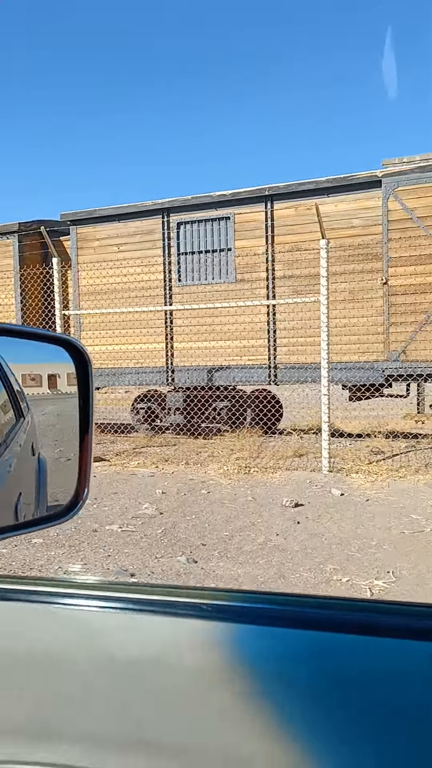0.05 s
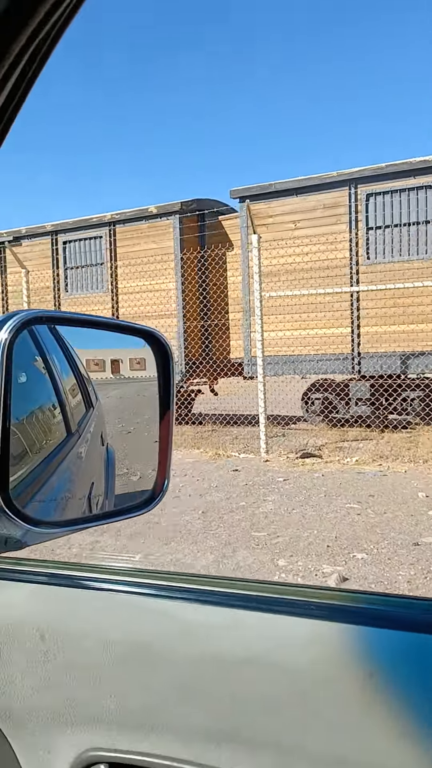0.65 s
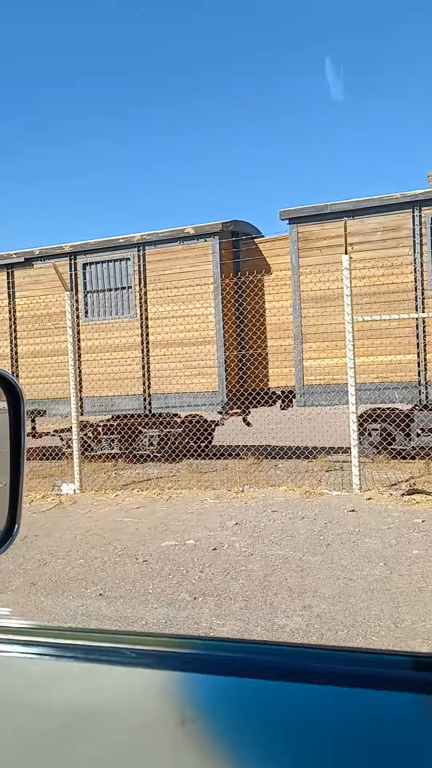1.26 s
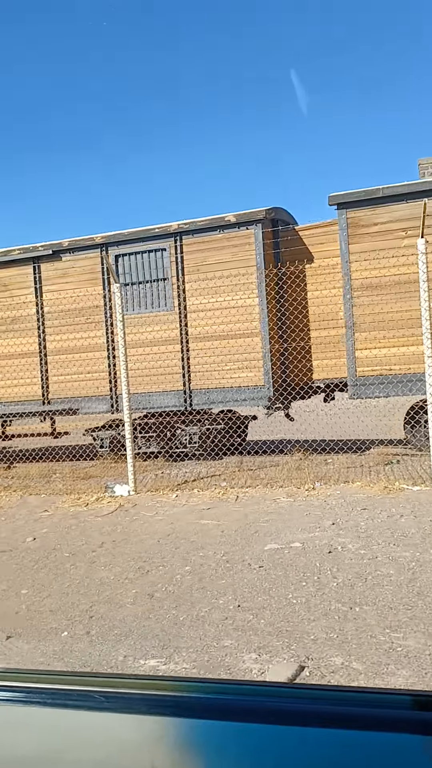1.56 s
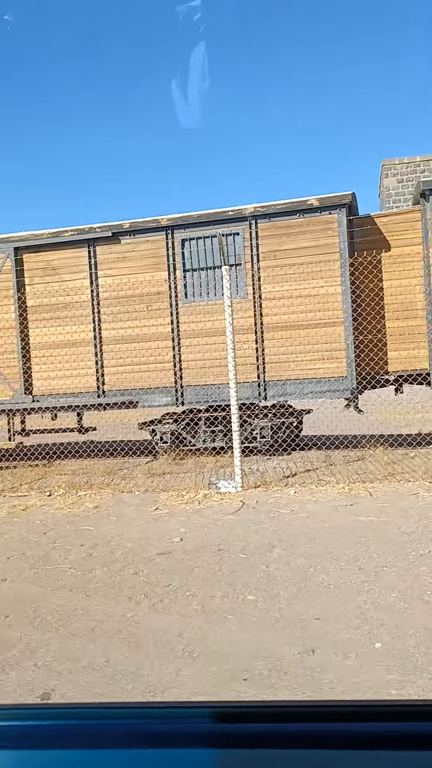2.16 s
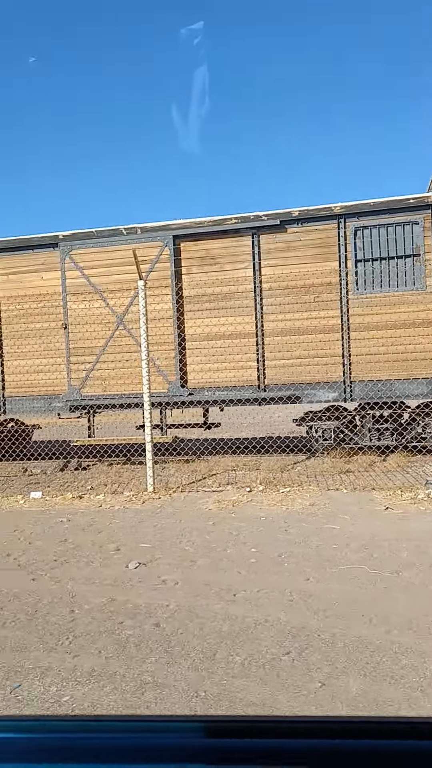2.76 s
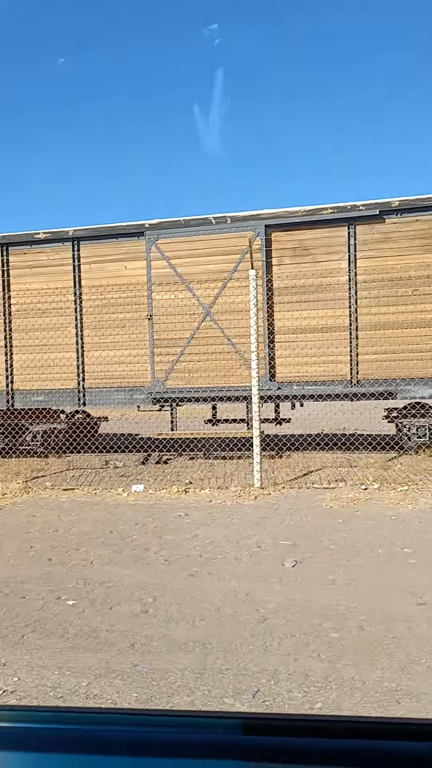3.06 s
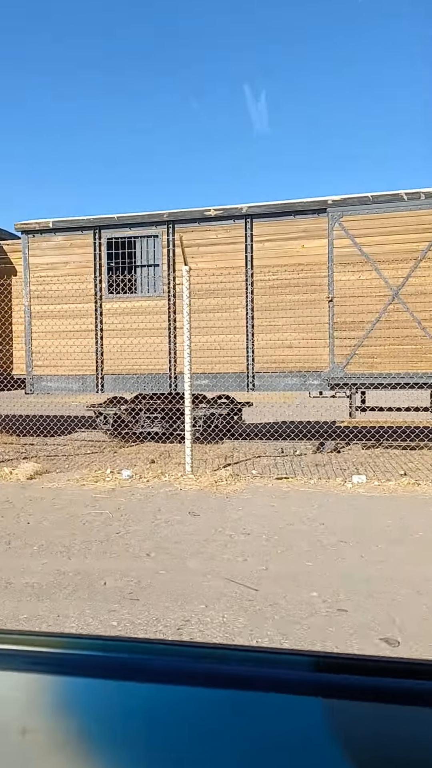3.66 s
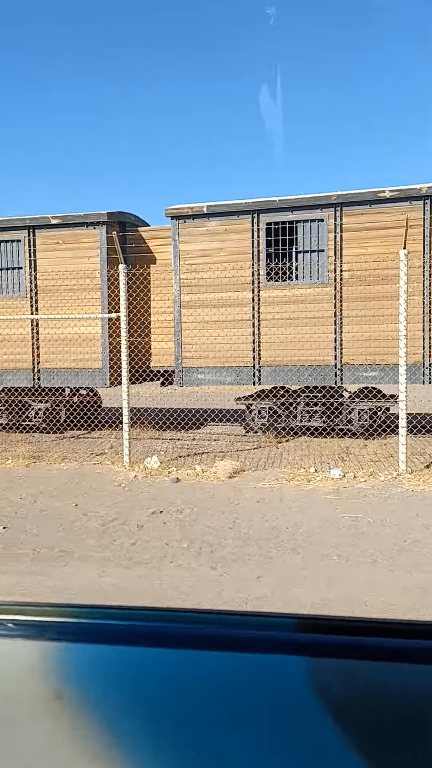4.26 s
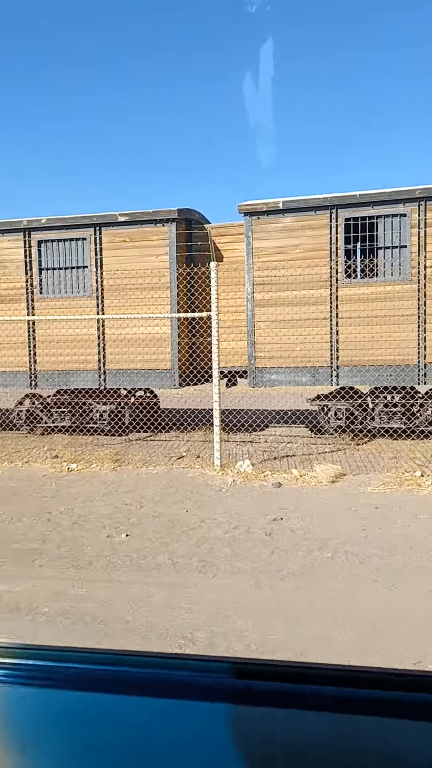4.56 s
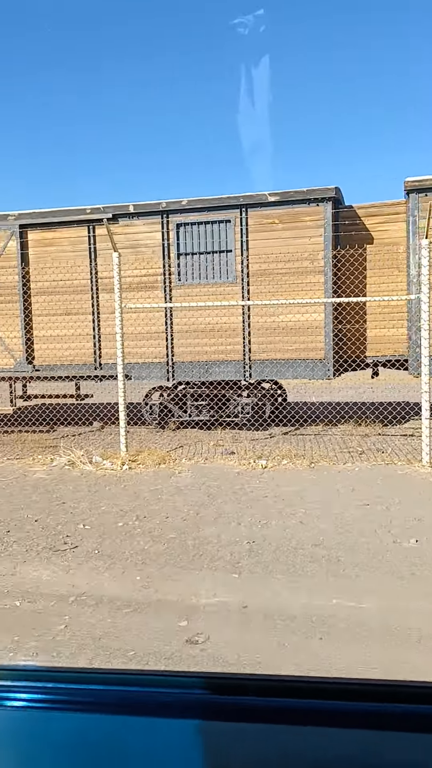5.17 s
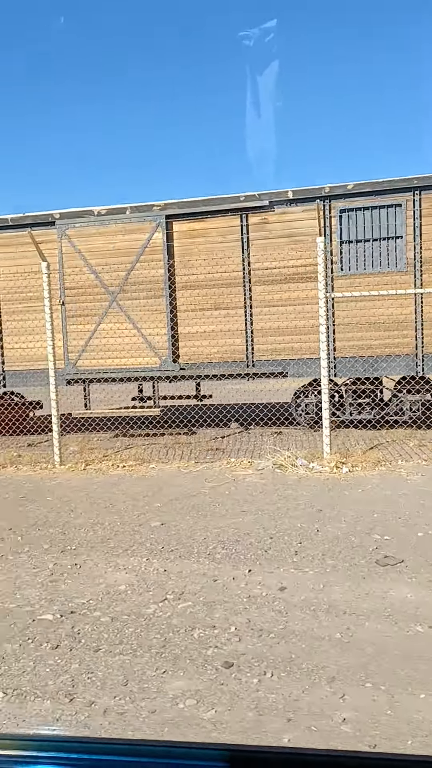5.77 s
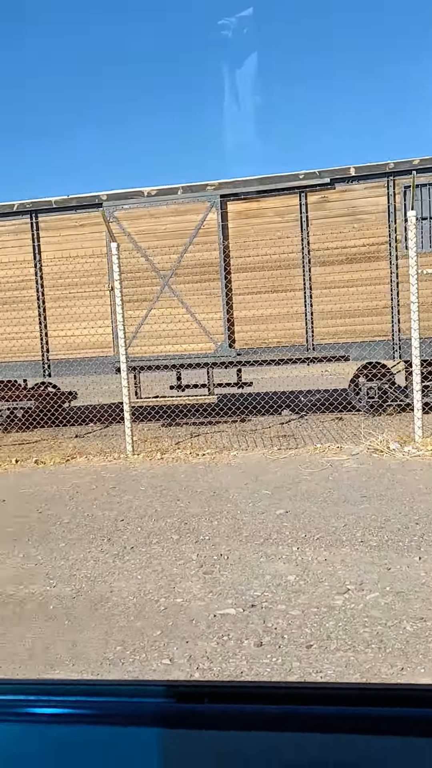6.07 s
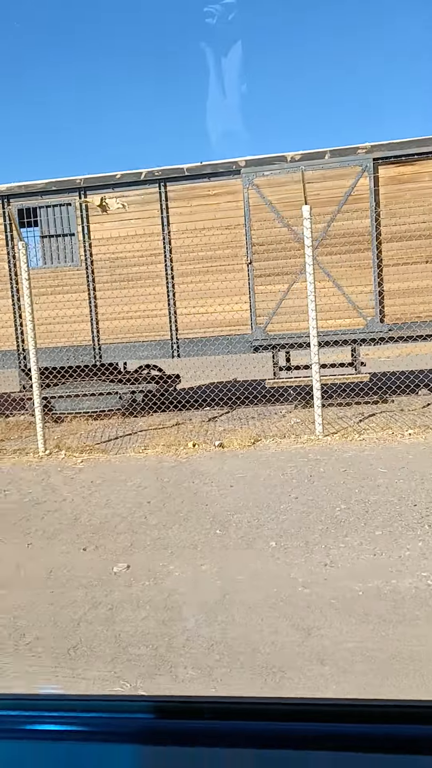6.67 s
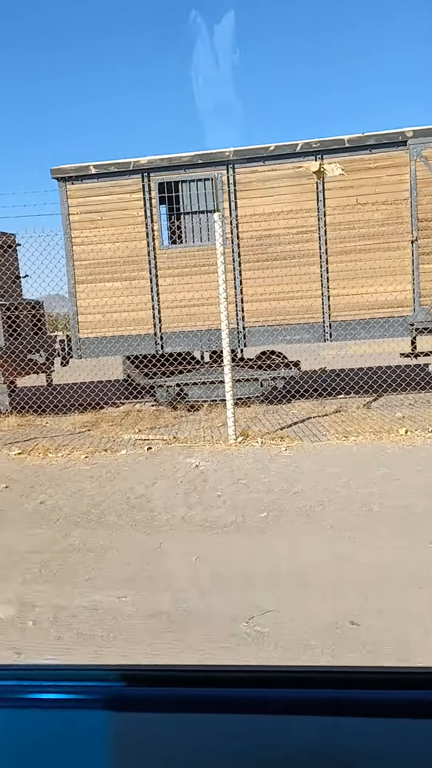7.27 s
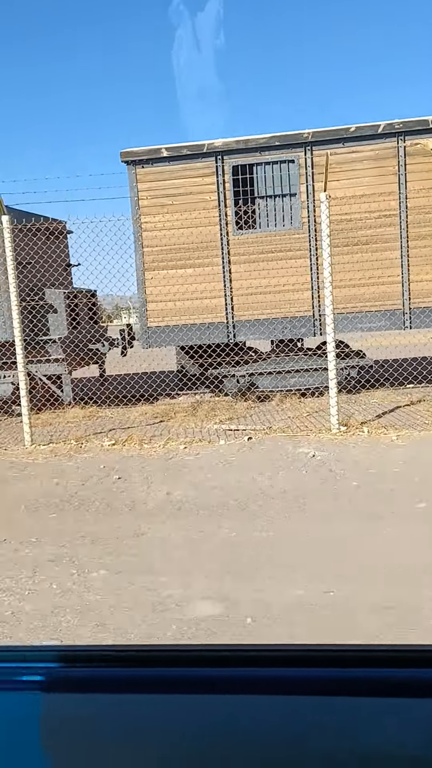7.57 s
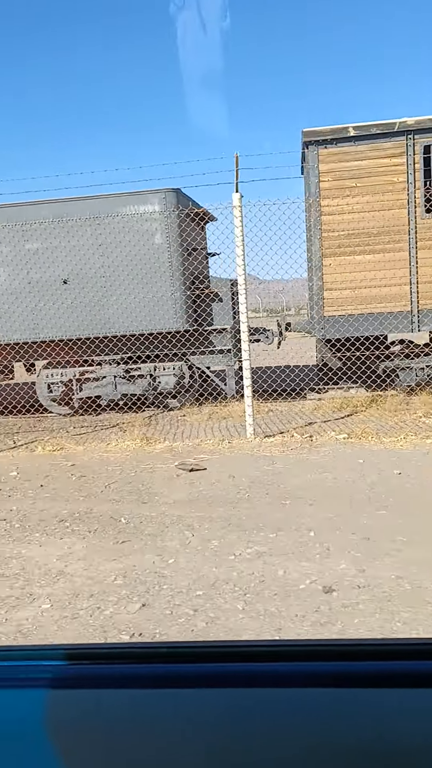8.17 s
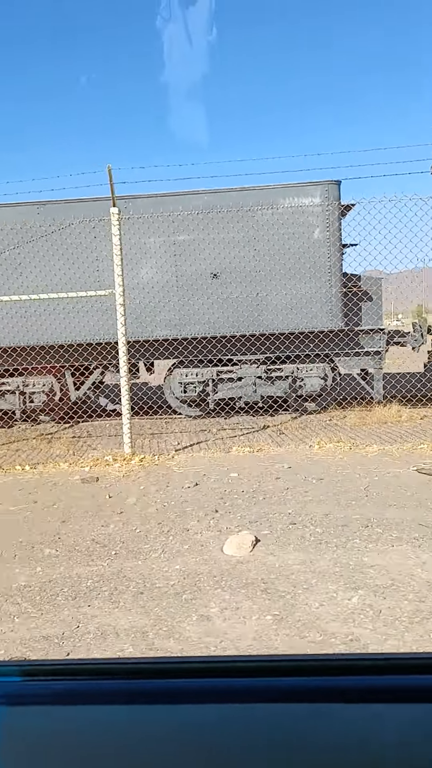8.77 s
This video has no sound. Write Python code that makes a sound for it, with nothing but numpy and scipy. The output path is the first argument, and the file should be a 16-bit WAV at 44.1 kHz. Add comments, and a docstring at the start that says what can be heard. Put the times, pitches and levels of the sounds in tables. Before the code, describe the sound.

Inside a closed car, tyres and engine drone along rough ground with booming bumps, faint gravel ticks and a late plastic rattle.

```python
"""Inside a car rolling slowly along a dirt road, windows shut.
Bumps and rough ground shake the body and make the cabin's air boom, over the roar of the tyres and
a steady fan hum. The engine's note climbs, then eases. Late on, loose trim knocks, sets the door
ringing and rattles a little. Grit ticks and crunches, and tiny high chirps come more often later."""
import sys
import numpy as np
from scipy import signal
from scipy.fft import rfft, irfft
from scipy.io import wavfile
from scipy.ndimage import uniform_filter1d

SR = 44100
rng = np.random.default_rng(int(sys.argv[2]) if len(sys.argv) > 2 else 0)


def dump(signal):
    """Clip the signal to [-1, 1] and save it as 16-bit WAV at the path in sys.argv[1]."""
    limited = np.clip(np.atleast_2d(signal).T, -1, 1)
    pcm = np.round(limited * 32767).astype(np.int16)
    wavfile.write(sys.argv[1], SR, pcm)


N = 393372
TIME = np.arange(N) / SR
HZ = np.fft.rfftfreq(N, 1 / SR)

# bumps under the wheels: (time of the peak [s], relative strength [dB])
BUMPS = [(0.099, 3), (0.179, 8), (.37, 7), (.54, 2.5), (.67, 6), (.75, 4), (1.102, 8.5), (1.281, 6.5),
         (1.47, 5.5), (1.691, 4.5), (2.049, -1), (2.429, 7.5), (2.66, 6.5), (2.75, 6), (2.908, 8),
         (3.06, 8.5), (3.47, 4.5), (3.779, 6), (4.089, 6), (4.8, 2), (5.15, 6.5), (5.34, 6.5), (5.44, 4),
         (5.53, 9.5), (5.86, 8.5), (6.199, 8.5), (6.749, 7), (6.841, 7.5), (6.95, 1), (7.21, 3.5),
         (7.31, 10), (7.57, 1.5), (7.9, 7), (8.3, 7.5), (8.9, 5)]
# how much grit lies under the tyres: (time [s], relative level [dB])
GRIT_AMOUNT = [(0, -80), (1.2, -90), (2.1, -80), (5.3, -78.5), (5.8, -80), (7.3, -75.5), (8.92, -78)]
# the tone of a snapping grain of grit: (frequency [Hz], relative level [dB])
SNAP_SPECTRUM = [(5000, -27.5), (9500, -9), (11500, 0), (13200, -2.5), (14300, -3), (15500, -5)]


def rumble():
    """The road shakes the car's body, the air in the cabin and the air in the tyres."""
    # the tone of each of the three: (frequency [Hz], relative level [dB])
    shudder_spectrum = [(15, -30), (30, -25), (42, -14), (54, -3.5), (64, -0.5), (78, 3.5), (95, -19)]
    boom_spectrum = [(58, -35), (78, -8.5), (100, -0.5), (120, -0.5), (133, -6.5), (150, -11.5), (175, -33),
                     (240, -42.5)]
    drone_spectrum = [(135, -25), (175, -5), (205, -3.5), (228, 2.5), (255, -3.5), (285, -8.5),
                      (330, -40.5), (450, -33.5)]
    # how rough the road is, and how loud the tyres drone: (time [s], level [dB])
    roughness = [(0, -1), (1.8, 1), (2.2, -2), (2.7, 3), (3.25, -2.5), (3.7, 3.5), (4.3, -1.5),
                 (4.95, -4.5), (5.5, 6), (5.7, -2), (6.5, -1), (6.85, 3), (7.35, 3.5), (7.7, -1),
                 (8.92, 2.5)]
    drone_level = [(0, -29), (.25, -35), (.4, -30.5), (.6, -31), (1.05, -33), (1.6, -30.5), (2.05, -33.5),
                   (2.45, -31), (2.8, -34), (3.55, -31), (3.85, -33), (4.35, -31.5), (5.35, -32),
                   (5.7, -33.5), (6.05, -32.5), (6.4, -35.5), (7.08, -33), (7.26, -29), (7.7, -34),
                   (8.3, -35.5), (8.65, -31), (8.92, -36.5)]
    bump_power = sum(amp(2 * db) * bump_swell(TIME - s) for s, db in BUMPS)
    def shaking(base_db, road_share, bump_share, waver_db):
        level_db = base_db + road_share * curve(roughness) + waver_db * drift(5.5)
        return amp(level_db) * np.sqrt(1 + bump_share * bump_power)
    shudder = steady_noise(shudder_spectrum)
    shudder *= shaking(base_db=-38, road_share=.49, bump_share=.1, waver_db=1.3)
    boom = steady_noise(boom_spectrum, window=4200)
    boom *= shaking(base_db=-27, road_share=.55, bump_share=.14, waver_db=1.1)
    drone = steady_noise(drone_spectrum) * amp(curve(drone_level) + drift(6.2))
    return shudder + boom + drone


def bump_throbs(base_db=-29, pitch_hz=110.2, spread_hz=17.5):
    """Each bump rings the cabin's air for a few cycles, near its lowest natural note."""
    out = np.zeros(N)
    for s, db in BUMPS:
        near = abs(TIME - s) < .15
        t = TIME[near] - s
        hz = pitch_hz + spread_hz * rng.uniform(-1, 1)
        tone = np.sin(2 * np.pi * (hz * t + rng.random()))
        out[near] += amp(base_db + db) * np.sqrt(2 * bump_swell(t)) * tone
    return out * pan(-2.1)


def bump_swell(t, rise_s=.024, fall_s=.025):
    """A bump's power swells to a peak at t = 0, then settles."""
    return np.exp(-(t / np.where(t < 0, rise_s, fall_s)) ** 2)


def engine(octave_db=-2, throb_db=2):
    """The cylinders fire in a low note that climbs with the revs and sinks as the driver eases off."""
    # the engine's note: (time [s], firing rate [Hz], relative level [dB])
    revs = [(0, 53, -42), (0.449, 55.5, -43), (0.902, 59.5, -38.5), (1.601, 62.3, -45.5), (2, 63, -44),
            (2.5, 64.5, -34.5), (3.4, 66.5, -37), (4.2, 64, -40.5), (4.7, 62.8, -36), (5.4, 65.3, -40),
            (5.9, 68, -42.5), (6.5, 60, -40.5), (7.1, 56, -41), (7.7, 54.5, -42), (8.92, 53.5, -46)]
    s, hz, db = np.transpose(revs)
    angle = 2 * np.pi * (np.cumsum(np.interp(TIME, s, hz)) / SR + rng.random())
    note = np.sin(angle) + amp(octave_db) * np.sin(2 * angle)
    level_db = np.interp(TIME, s, db) + throb_db * drift(9.2)
    return np.sqrt(2) * note * amp(level_db) * pan(-1.5)


def tyre_roar(base_db=-40, flutter_db=.6, frame=2048):
    """Tyres roar on dirt through ringing panels; the tone shifts as the listener moves."""
    # the roar heard through the body: (frequency [Hz], relative level [dB])
    spectrum = [(150, -25), (300, 3.5), (410, 2.4), (475, -5), (615, -1), (720, -12.5), (980, -7.5),
                (1180, -17.5), (2200, -21.5), (3000, -29.5), (5200, -33.5), (8500, -40.5), (12000, -48),
                (16000, -58.5)]
    # where panels and glass ring: (frequency [Hz], width [Hz], left boost [dB], right boost [dB])
    panels = [(516, 85, 2, 2.5), (813, 74, 6, 10), (931, 74, 6.5, -1), (1020, 25, 2, 4), (1097, 25, 2, 2.5),
              (1360, 130, 5.5, 8), (1503, 130, 2, 3), (1786, 90, 4, 5.5), (1925, 55, 4, 2.5),
              (2106, 73, 1, 6), (2200, 140, 3.5, 4), (2550, 310, 0.5, 2.5), (3550, 900, 0, -3),
              (4100, 70, 0.5, 0.5), (5250, 900, 0.2, 1.4), (7340, 600, 4, 3)]
    # the whole roar, and its hiss, as the ground changes: (time [s], boost [dB])
    roar_level = [(0, 0), (1.15, 0.3), (1.5, 0.66), (2.9, 0.4), (3.3, 0.2), (3.85, 0.5), (4.2, 0.2),
                  (4.6, -0.5), (5.4, 1), (6.0, -0.05), (6.8, 0), (8.92, -0.64)]
    hiss_level = [(0, 2.8), (1.8, -1.9), (2.35, -1.3), (3, -1.5), (3.45, 1.7), (3.75, -1.5), (4.2, 2),
                  (4.7, -0.5), (5.3, -0.2), (5.85, -0.5), (6.2, -0.5), (6.7, 1), (7.6, 0.8), (8.1, 2.7),
                  (8.92, 0.5)]
    panel_db = sum(np.outer([left, right], bell(hz, width)) for hz, width, left, right in panels)
    roar = cabin_noise(colour(spectrum, HZ) * amp(panel_db))
    f, t, slices = signal.stft(roar, SR, nperseg=frame)  # slices: ear, frequency, time
    slices = standing_waves(slices, f, t)
    hiss_db = np.outer(bell(3000, 1800, f), curve(hiss_level, t))
    slices *= amp(hiss_db + echo_ripple_db(f, t, frame))
    roar = signal.istft(slices, SR, nperseg=frame)[1][:, :N]
    return roar * amp(base_db + curve(roar_level) + flutter_db * drift(21))


def standing_waves(slices, f, t, hollow_db=-8.5):
    """Rising to the window, the listener passes spots where some pitches build up and others cancel."""
    # the spots: (start [s], end [s], frequency [Hz], width [Hz], left boost [dB], right boost [dB])
    spots = [(0, 1.35, 815, 110, 4, 4.5), (0, 1.15, 1010, 90, -8, 4.5), (0, 1.5, 1130, 100, 6, 5),
             (0, 1.35, 1400, 140, -6, -3.5), (0, 1.1, 1600, 110, 6.5, 3.5), (0, 1.8, 1750, 70, 2, -5),
             (0, 1.6, 2050, 300, -1, -3), (0, 1.05, 3450, 700, 0.5, -5), (.92, 1.3, 3470, 140, 10.5, 3),
             (0, 1.45, 3930, 400, -7, -2), (1.25, 1.85, 2890, 600, 1.5, -3.5),
             (1.4, 2.05, 4080, 120, 2, 6.5), (1.15, 1.6, 4550, 600, -1.5, 3.5),
             (0, .7, 4830, 1300, 1.5, 2.5), (3.1, 3.3, 930, 110, 4.5, -2), (3.3, 4.45, 1100, 100, -3, 1.5),
             (3.3, 4.7, 2260, 200, -1.5, -3)]
    def zone(start, end, hz, width, fade_s=.28):
        since_start = t - start if start > fade_s / 2 else np.inf
        inside = np.clip(np.minimum(since_start, end - t) / fade_s + .5, 0, 1)
        return bell(hz, width, f)[:, None] * inside
    # in one hollow spot, the sound that both ears share partly cancels
    hollow = zone(start=0, end=1.95, hz=964, width=119.5, fade_s=.8)
    slices = slices + slices.mean(0) * (amp(hollow_db * hollow) - 1)
    boost_db = sum(np.multiply.outer([left, right], zone(*spot)) for *spot, left, right in spots)
    return slices * amp(boost_db)


def echo_ripple_db(f, t, frame, count=60, longest_s=.016, sway_hz=.12):
    """Echoes off glass and trim leave fine peaks and dips in the tone, which shift as the listener sways."""
    def pattern():
        echoes = np.zeros((2, frame))
        delays = (SR * longest_s * rng.uniform(.15, 1, (2, count))).astype(int)
        np.put_along_axis(echoes, delays, rng.standard_normal((2, count)), 1)
        return evened(rfft(echoes).real)[..., None]
    sway = 2 * np.pi * sway_hz * t
    depth_db = np.interp(f, [700, 2500], [0, 1.3])[:, None]
    return depth_db * (pattern() * np.cos(sway) + pattern() * np.sin(sway))


def door_thud(knock_s=7.2685, lag_cycles=2.4, rise_cycles=1.9):
    """The hardest knock rings the door: a clack first, then the low notes, which swell more slowly."""
    # the door's natural notes: (pitch [Hz], level [dB], time to fade by 60 dB [s])
    notes = [(121.6, -14, 0.083), (166, -26, 0.054), (212.4, -19, 0.066), (273, -29, .06),
             (365, -26.5, 0.091), (438, -37, 0.067), (573, -23.5, 0.066), (646, -32, 0.067), (857, -40, .1),
             (950, -34.5, 0.099), (1320, -42, 0.074), (1500, -39, 0.056), (1605, -37, 0.056),
             (3570, -50, .03)]
    t, out = TIME[:SR // 2], np.zeros((2, N))
    for hz, db, t60 in notes:
        ring = swell_and_fade(t, rise_cycles / hz, t60) * np.sin(2 * np.pi * (hz * t + rng.random()))
        add(out, knock_s + lag_cycles / hz, amp(db) * ring * pan(-1))
    return out


def loose_trim():
    """A loose panel knocks in one quick cluster of hits; a smaller part rattles after it."""
    # the hits: (time [s], level [dB], rise [s], time to fade by 60 dB [s])
    knocks = [(7.225, -52, .022, .2), (7.2645, -33.5, .0008, 0.04), (7.2683, -32.5, 0.001, 0.055),
              (7.285, -48.5, .004, 0.38), (7.313, -54, .002, 0.035), (7.382, -48, .008, 0.26)]
    rattles = [(7.527, -54.5, .004, .08), (7.662, -52, .007, 0.14), (8.278, -52, .006, .15),
               (8.34, -47.5, 0.0047, 0.17), (8.409, -48.5, .006, 0.13), (8.494, -57, .002, .04)]
    # where each part rings: (frequency [Hz], width [Hz], relative level [dB])
    panel_rings = [(950, 37, -5), (1350, 90, 0), (1570, 270, 12.5), (2060, 120, 4), (2390, 300, 4.5),
                   (3480, 330, 2), (4280, 340, 0), (5340, 180, -1), (5780, 200, -2), (6800, 200, -9),
                   (7650, 260, -6), (10000, 2500, -21)]
    small_part_rings = [(1950, 250, 11), (3100, 320, 4.5), (4120, 160, -1), (4750, 250, -2), (5220, 160, 2),
                        (5850, 150, -3), (6800, 260, -2), (7350, 180, -8)]
    return chatter(knocks, panel_rings) * pan(-2) + chatter(rattles, small_part_rings)


def chatter(hits, rings):
    """Plastic parts strike each other and ring briefly."""
    def gain_at(f):
        power = sum(amp(2 * db) / (1 + ((f - hz) / width) ** 2) ** 2 for hz, width, db in rings)
        return np.sqrt(power)
    out = np.zeros((2, N))
    for s, db, rise, t60 in hits:
        add(out, s, amp(db) * burst(gain_at, rise, t60))
    return out


def chirps(note_db=-3, echo_db=-16, sag_hz_per_s=19000):
    """Likely a loose metal part touching: each chirp is a high, sinking note with an echo off the glass."""
    # the chirps: (time [s], relative level [dB], starting pitch [Hz])
    touches = [(1.1115, -58, 10000), (1.7585, -56, 10200), (1.965, -50.5, 10300), (4.019, -60, 10000),
               (4.267, -60, 10700), (4.711, -55, 10050), (4.773, -58, 9400), (4.859, -56, 10100),
               (5.29, -56, 10000), (5.43, -57, 10050), (6.071, -57, 10100), (6.099, -56, 10150),
               (6.239, -51, 10200), (6.764, -53, 10100), (7.211, -47, 10140), (7.41, -47, 10140),
               (7.769, -56, 10200), (7.861, -59, 10300), (8.099, -47.5, 10200), (8.435, -53, 10200)]
    t, out = TIME[:SR // 20], np.zeros((2, N))
    shape = swell_and_fade(t, rise=.0015, t60=.01)
    for s, db, hz in touches:
        cycles = np.cumsum(hz - sag_hz_per_s * t) / SR
        note = shape * np.sin(2 * np.pi * cycles)
        echo = burst(lambda f: bell(hz, 550, f), rise=.005, t60=.07)
        add(out, s, amp(db + note_db) * note[None])
        add(out, s, amp(db + echo_db) * echo)
    return out * pan(-12)


def grit_ticks(snap_db=1, spray_db=-19, rise_s=.0012):
    """Grit snaps against the body and trails a spray of finer grains."""
    # the loudest snaps: (time [s], relative level [dB])
    loud_ticks = [(1.115, -66), (3.508, -57), (3.915, -63), (4.672, -62), (6.0268, -58), (6.4623, -60),
                  (7.0455, -53), (7.7339, -59), (7.7479, -58), (7.91, -59), (8.4583, -50)]
    def gain_at(f):
        return colour(SNAP_SPECTRUM, f)
    out = np.zeros((2, N))
    for s, db in [*loud_ticks, *faint_ticks()]:
        snap = amp(snap_db) * burst(gain_at, rise_s, t60=.014)
        spray = amp(spray_db) * burst(gain_at, rise=.015, t60=.3)
        add(out, s - rise_s, amp(db) * (snap + spray))
    return out * pan(-9)


def faint_ticks(count=80, per_s=3, above_grit_db=8, spread_db=5.5):
    """Small ticks fall at random, louder where grit lies thick: (time [s], relative level [dB])."""
    wait, strength = rng.random((count, 2)).T
    s = np.cumsum(-np.log(1 - wait)) / per_s
    db = curve(GRIT_AMOUNT, s) + above_grit_db + spread_db * (2 * strength - 1)
    return np.column_stack([s, db])[s < TIME[-1]]


def gravel_crunches(grains_per_s=700, spread_db=3.5, rise_s=.012):
    """A tyre crushes a patch of gravel: a cluster of uneven grains that dies away."""
    # the patches: (time [s], level [dB], fade length [s])
    patches = [(.42, -82, .1), (1.106, -80, 0.11), (1.938, -78, .15), (3.152, -78, .15), (3.51, -74, .15),
               (3.9, -77, .14), (4.854, -77, .12), (5.32, -73, .16), (6.036, -72, .12), (6.46, -77, .12),
               (6.78, -69, .25), (7.03, -75, .1), (7.23, -67, .35), (7.39, -75, .25), (7.72, -71.5, .22),
               (8.09, -68.5, .25), (8.34, -69.5, .3), (8.45, -74, .15), (8.82, -74, 0.22)]
    sizes = amp(spread_db * np.minimum(rng.exponential(1, (2, N)), 4))
    clicks = sizes * (rng.random((2, N)) < grains_per_s / SR)
    grains = evened(irfft(rfft(clicks) * colour(SNAP_SPECTRUM, HZ), N))
    level = sum(amp(db) * np.interp(TIME, [s, s + rise_s, s + rise_s + fade_s], [0, 1, 0]) ** 2
                for s, db, fade_s in patches)
    return grains * level * pan(-7)


def fan(shaft_hz=47.93, wander=.0012, top_lag_radians=.73):
    """A steady hum, likely the blower: tones at multiples of its spin rate, each wavering a little."""
    # the tones: (multiple of the spin rate, level [dB], left minus right [dB])
    tones = [(4, -46, 1), (7, -59.5, 7.5), (9, -57, 1), (12, -49.5, -2.5)]
    turns = np.cumsum(shaft_hz * (1 + wander * drift(2.6))) / SR
    out = np.zeros((2, N))
    for multiple, db, lean_db in tones:
        lag = np.array([[0], [top_lag_radians]]) * multiple / tones[-1][0]  # later at the right ear
        tone = np.sqrt(2) * np.sin(2 * np.pi * (multiple * turns + rng.random()) - lag)
        out += tone * pan(lean_db) * amp(db + .8 * drift(4))
    return out


def grit_fizz(boost_db=3, flicker_db=1, patchy_db=1.2):
    """Fine grit, crushed under the tyres, makes a faint high fizz."""
    # the fizz's tone: (frequency [Hz], relative level [dB])
    spectrum = [(5000, -25.5), (8500, 0), (10000, 4), (11000, 0.5), (12800, 0), (14000, -6.5), (16000, -7)]
    level_db = curve(GRIT_AMOUNT) + boost_db + patchy_db * drift(5) + flicker_db * drift(150)
    return cabin_noise(colour(spectrum, HZ)) * amp(level_db) * pan(-4)


def cabin_noise(gain):
    """Noise in the cabin: both ears hear nearly the same bass, but different treble."""
    # how alike the ears' sounds are: (frequency [Hz], likeness [0 to 1])
    likeness = [(60, .995), (200, .99), (300, .93), (600, .87), (800, .68), (1000, .48), (1400, .45),
                (2000, .25), (3000, .12), (12000, 0)]
    # how far the left ear is ahead: (frequency [Hz], lead [radians])
    left_lead = [(40, 0), (100, -.15), (270, .16), (400, -.7), (520, -1), (620, -.4), (700, -.7),
                 (790, 1.4), (950, -.7), (1400, -1.5), (2000, -3)]
    # which ear hears more: (frequency [Hz], left minus right [dB])
    balance = [(60, -4), (92, -1.5), (140, -2.5), (210, -2), (330, 5.5), (500, -0.5), (770, 0),
               (1170, -0.5), (1790, -7.5), (2740, -0.5), (4190, -0.5), (6410, -0.5), (9810, -3),
               (15000, -7)]
    left, unrelated = rfft(rng.standard_normal((2, N)))
    same = np.clip(read(likeness, HZ), -1, 1)
    right = (same * left + np.sqrt(1 - same ** 2) * unrelated) * np.exp(-1j * read(left_lead, HZ))
    return evened(irfft(np.array([left, right]) * gain * pan(read(balance, HZ)), N))


def steady_noise(spectrum, window=6500):
    """Cabin noise with its chance swells smoothed out over a window of samples."""
    noise = cabin_noise(colour(spectrum, HZ))
    power = uniform_filter1d((noise ** 2).mean(0), window)
    return noise / np.sqrt(uniform_filter1d(power, window // 2))


def burst(gain_at, rise, t60, size=8192):
    """A short scrape of noise, different at each ear but equally strong."""
    shape = swell_and_fade(TIME[:size], rise, t60)
    gain = gain_at(np.fft.rfftfreq(size, 1 / SR))
    sound = irfft(rfft(rng.standard_normal((2, size))) * gain) * shape
    return sound * np.linalg.norm(shape) / np.linalg.norm(sound, axis=1, keepdims=True)


def swell_and_fade(t, rise, t60):
    """Climbs to 1 in `rise` seconds, then falls by 60 dB every `t60` seconds."""
    return np.minimum(t / rise, 1) * np.exp(-np.log(1000) * np.maximum(t - rise, 0) / t60)


def drift(rate_hz):
    """A random wobble of typical size 1, with little in it faster than the given rate."""
    gain = np.exp(-(HZ / rate_hz) ** 2) * (HZ > 0)
    return evened(irfft(rfft(rng.standard_normal(N)) * gain, N))


def bell(hz, width, f=HZ):
    """A rounded peak around one frequency."""
    return 1 / (1 + (2 * (f - hz) / width) ** 2)


def colour(points, hz):
    """Turns a spectrum table into gains that fall steeply beyond its ends."""
    outside = np.minimum(1, hz / points[0][0]) * np.minimum(1, points[-1][0] / (hz + 1))
    return amp(read(points, hz)) * outside ** 2


def read(points, hz):
    """Reads a table along frequency, with octaves evenly spaced."""
    f, value = np.transpose(points)
    return np.interp(np.log(hz + 1), np.log(np.sort(f) + 1), value)


def curve(points, s=TIME):
    """Reads a table along time."""
    return np.interp(s, *np.transpose(points))


def amp(db):
    """Turns decibels into a gain."""
    return 10 ** (np.asarray(db) / 20)


def evened(x):
    """Scales a signal to an average power of 1."""
    return x / np.sqrt(np.mean(x ** 2) + 1e-20)


def pan(lean_db):
    """Left and right gains; a negative lean is louder on the right."""
    return amp(np.array([[.5], [-.5]]) * lean_db)


def add(mix, s, sound):
    """Mixes a sound in, starting at `s` seconds."""
    part = mix[:, round(s * SR):][:, :sound.shape[1]]
    part += sound[:, :part.shape[1]]


def scene():
    """Everything heard from the seat by the side window."""
    rolling = rumble() + bump_throbs() + tyre_roar() + grit_fizz() + engine() + fan()
    return rolling + loose_trim() + door_thud() + grit_ticks() + gravel_crunches() + chirps()


def record(dry, top_hz=15720, fade_s=.004):
    """Softens both ends and cuts off the very highest treble."""
    to_nearest_end = np.minimum(TIME, TIME[::-1])
    fade = np.sin(np.pi / 2 * np.minimum(to_nearest_end / fade_s, 1)) ** 2
    low_pass = signal.firwin(1023, top_hz, window=("kaiser", 9), fs=SR)
    return signal.oaconvolve(dry * fade, low_pass[None], "same", axes=1)


dry = scene()
out = record(dry)
dump(out)
```